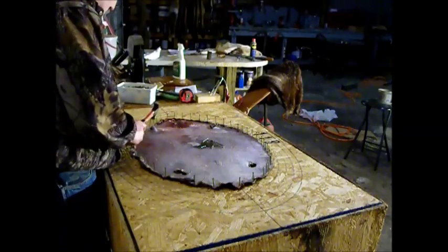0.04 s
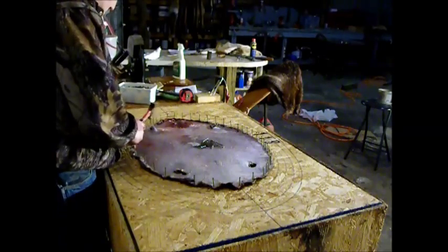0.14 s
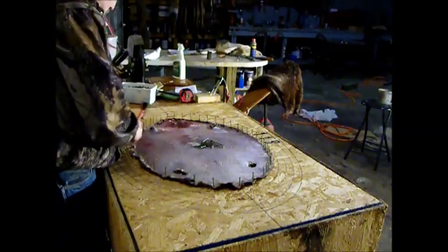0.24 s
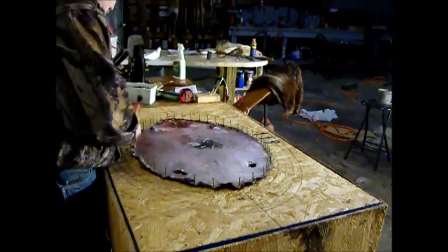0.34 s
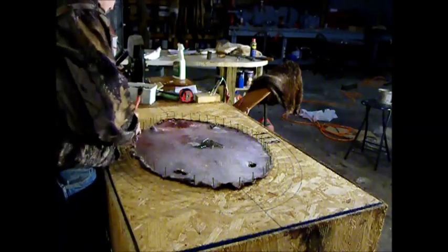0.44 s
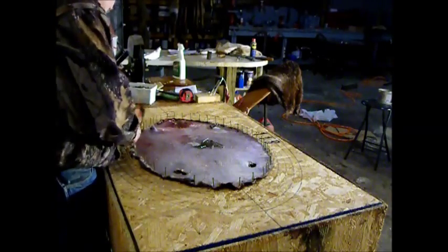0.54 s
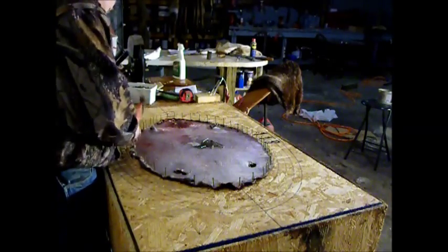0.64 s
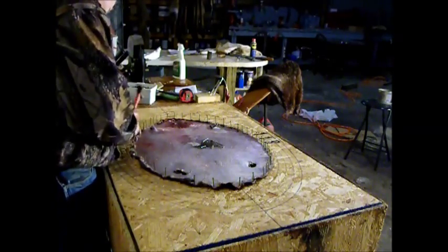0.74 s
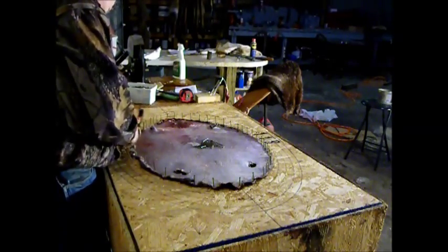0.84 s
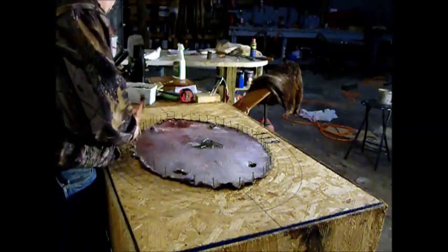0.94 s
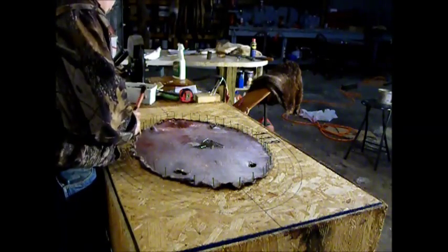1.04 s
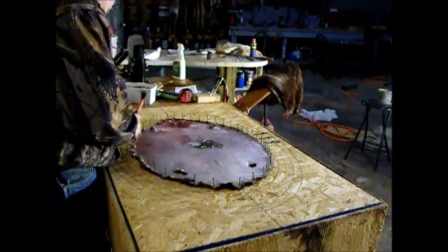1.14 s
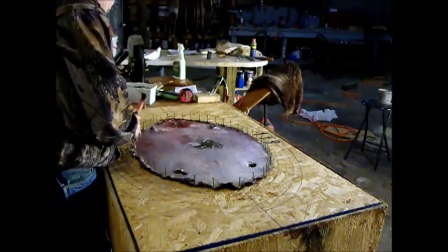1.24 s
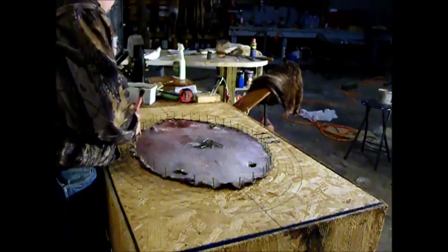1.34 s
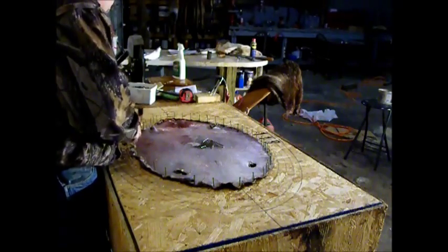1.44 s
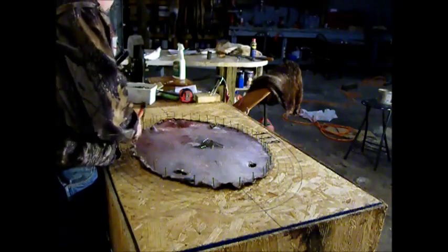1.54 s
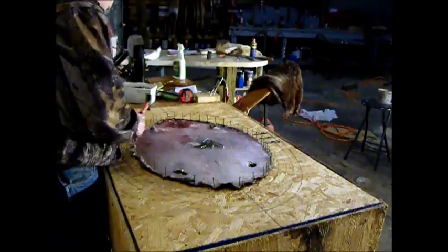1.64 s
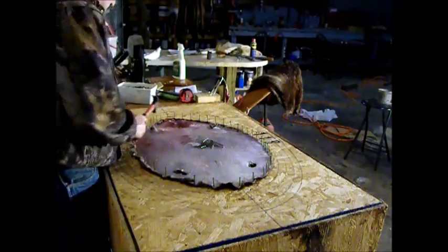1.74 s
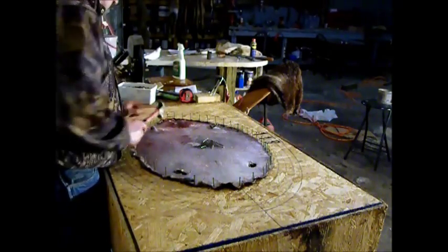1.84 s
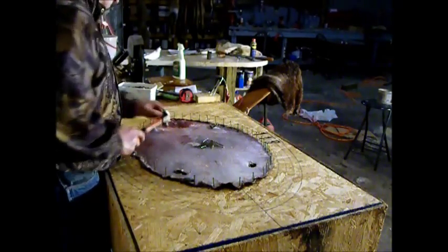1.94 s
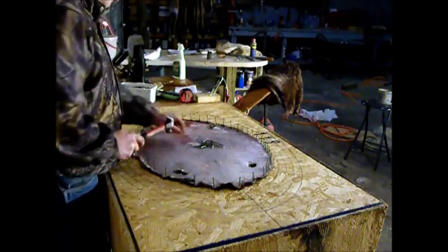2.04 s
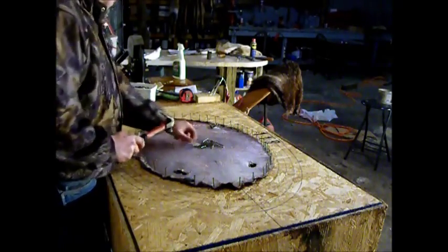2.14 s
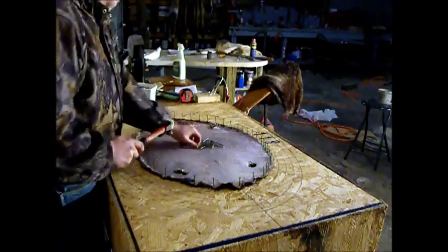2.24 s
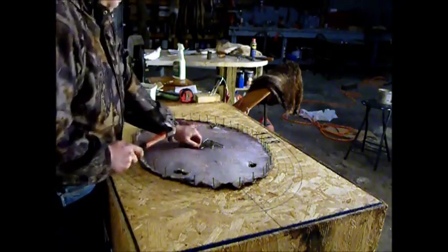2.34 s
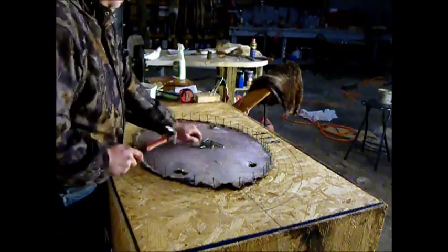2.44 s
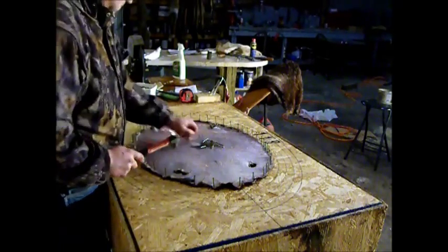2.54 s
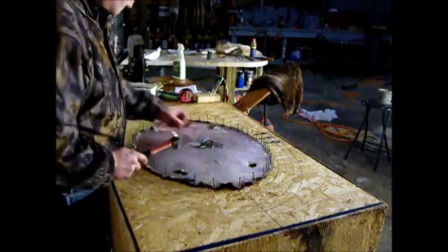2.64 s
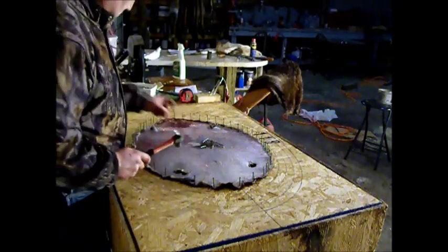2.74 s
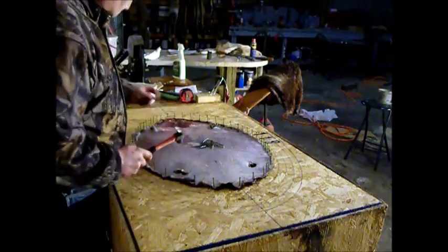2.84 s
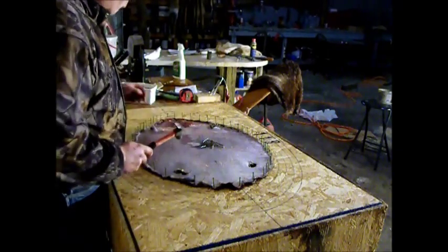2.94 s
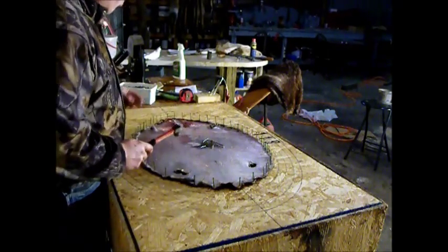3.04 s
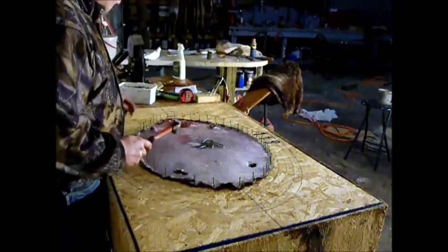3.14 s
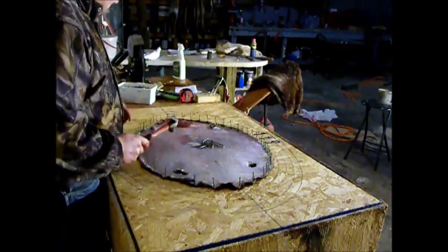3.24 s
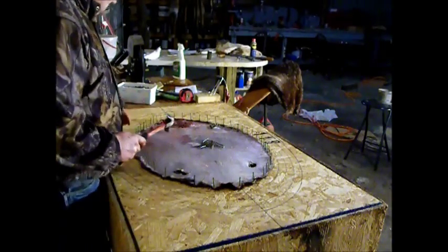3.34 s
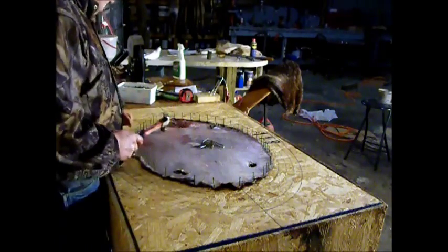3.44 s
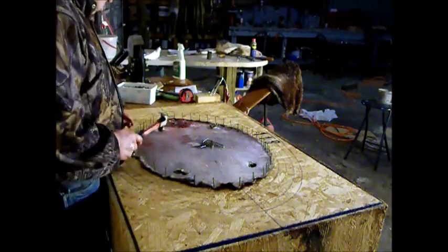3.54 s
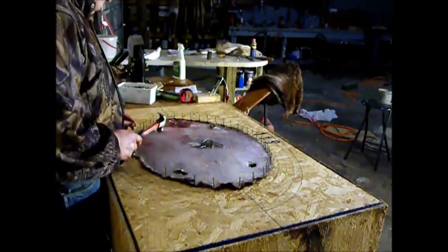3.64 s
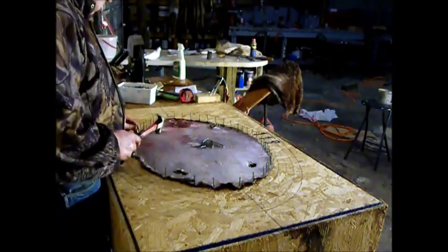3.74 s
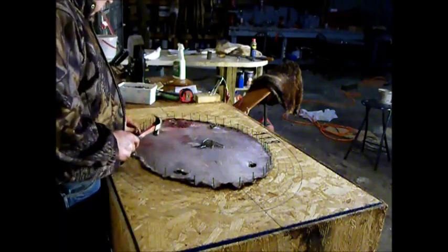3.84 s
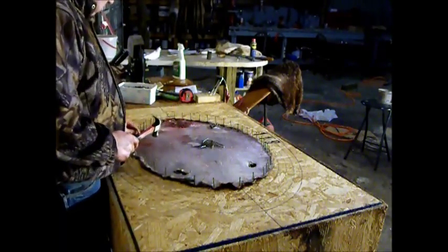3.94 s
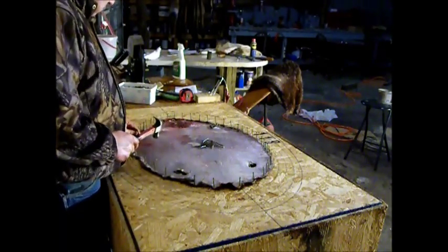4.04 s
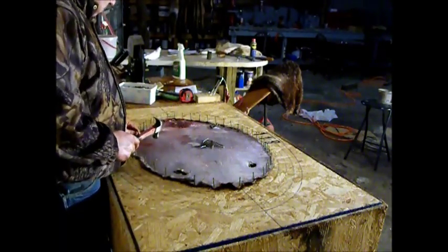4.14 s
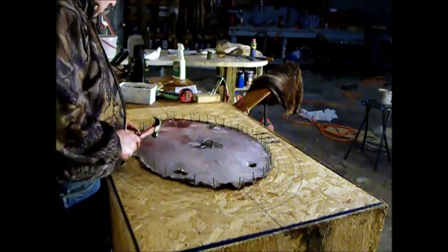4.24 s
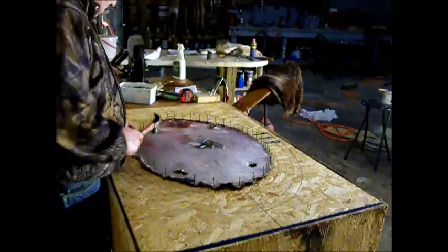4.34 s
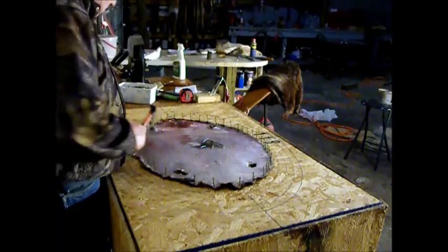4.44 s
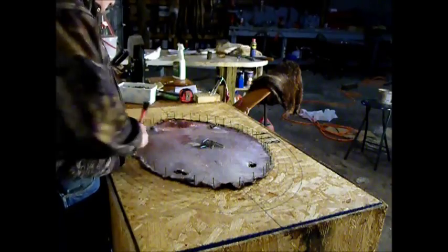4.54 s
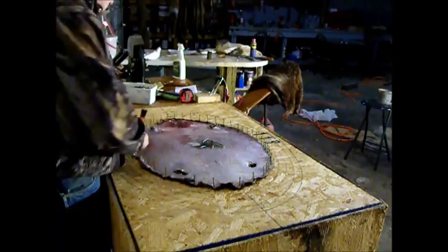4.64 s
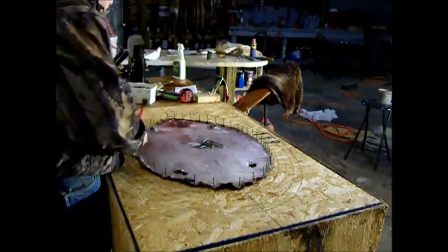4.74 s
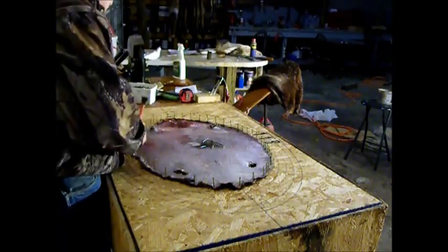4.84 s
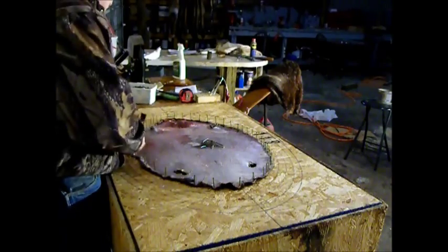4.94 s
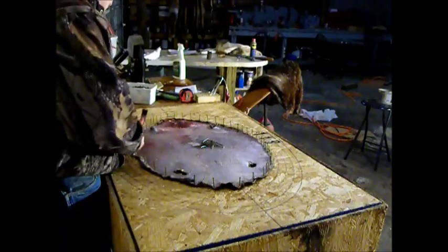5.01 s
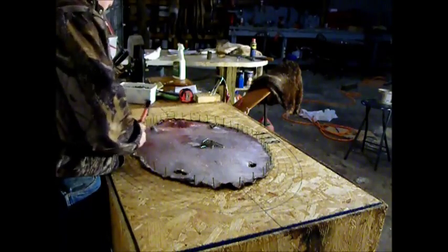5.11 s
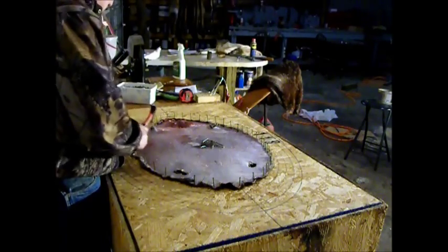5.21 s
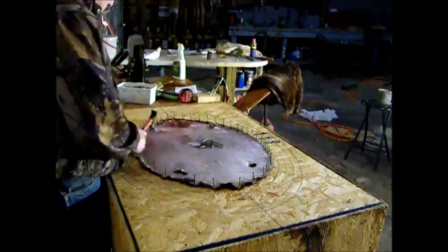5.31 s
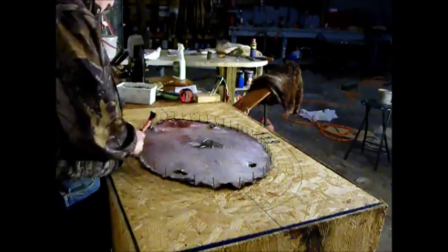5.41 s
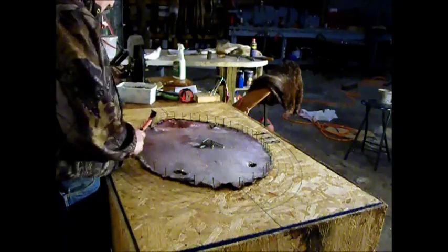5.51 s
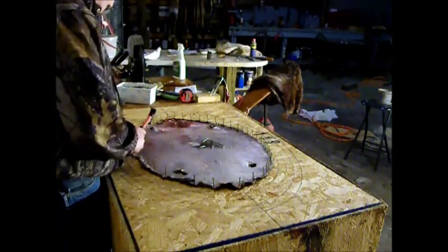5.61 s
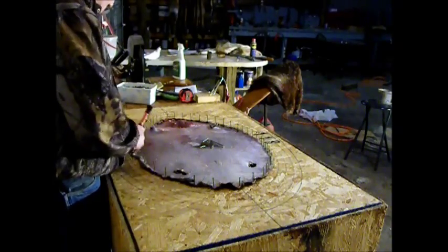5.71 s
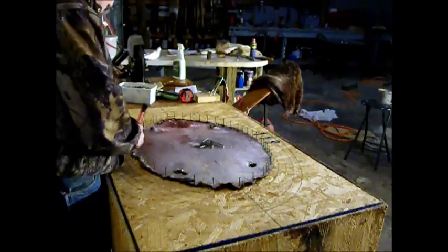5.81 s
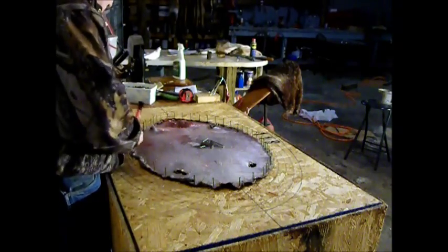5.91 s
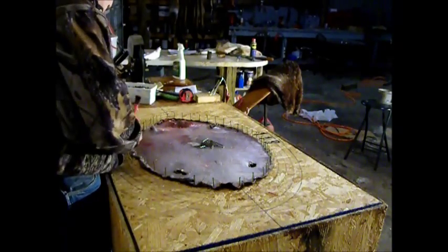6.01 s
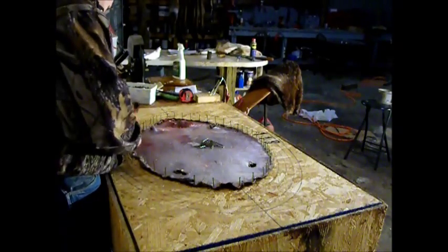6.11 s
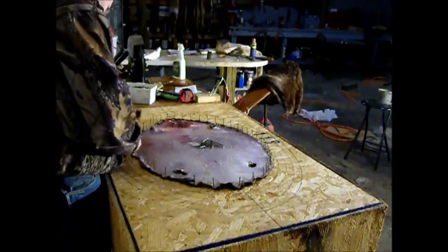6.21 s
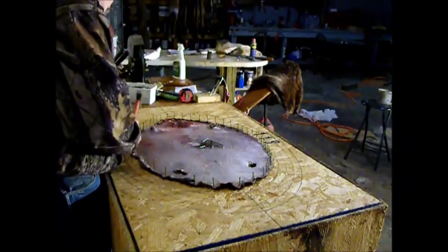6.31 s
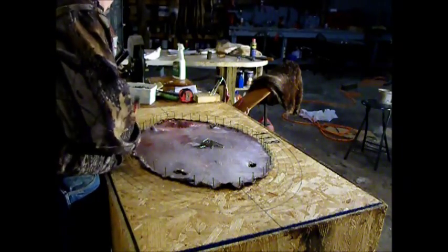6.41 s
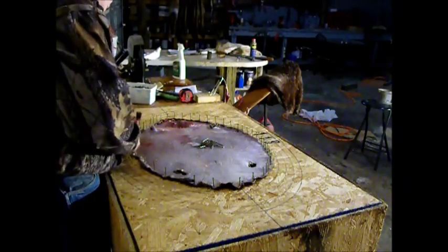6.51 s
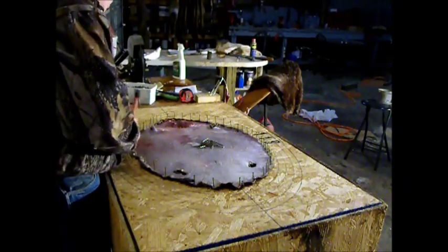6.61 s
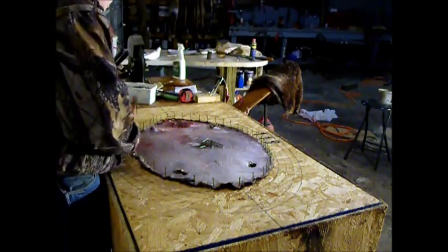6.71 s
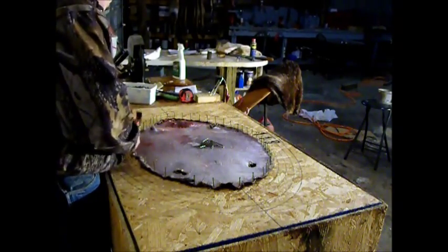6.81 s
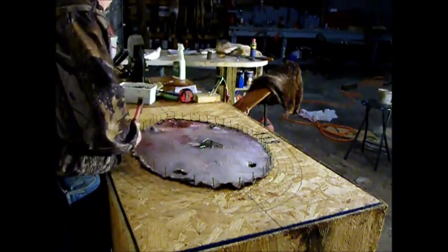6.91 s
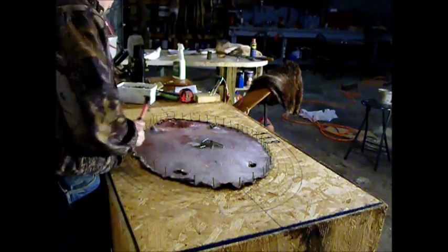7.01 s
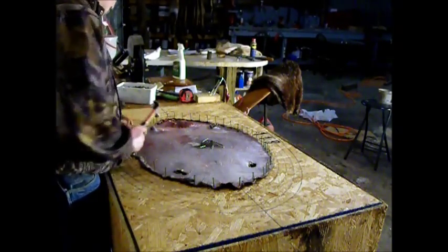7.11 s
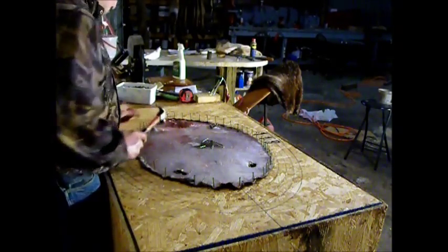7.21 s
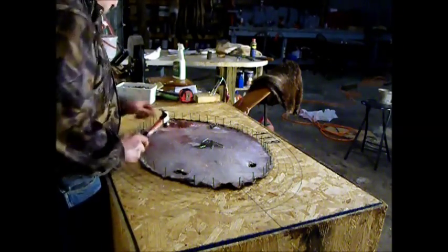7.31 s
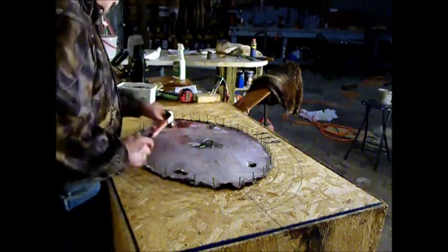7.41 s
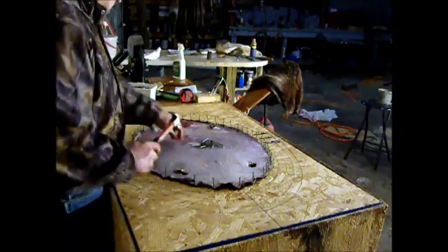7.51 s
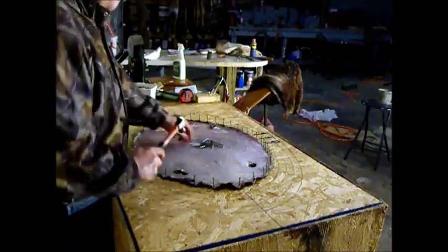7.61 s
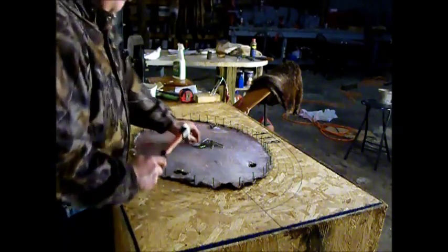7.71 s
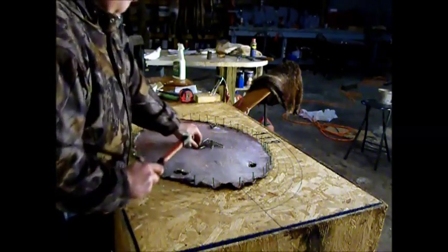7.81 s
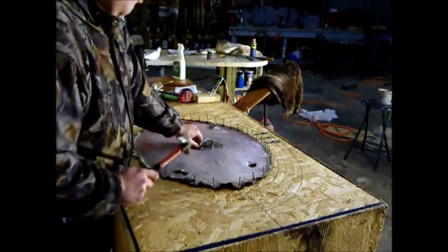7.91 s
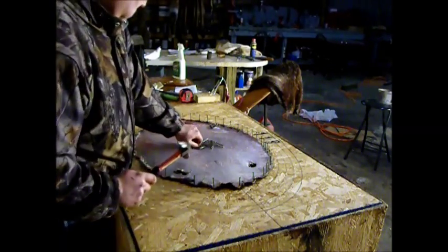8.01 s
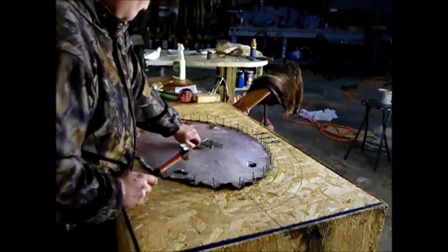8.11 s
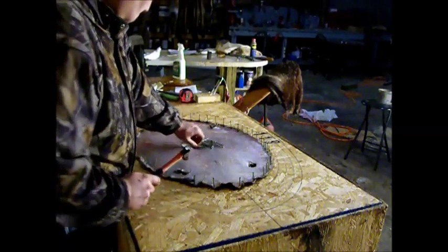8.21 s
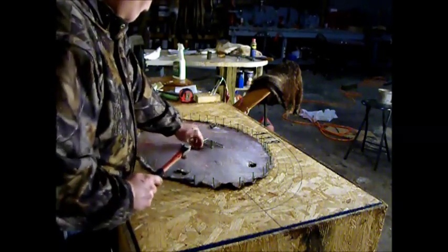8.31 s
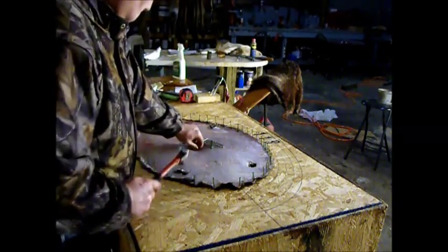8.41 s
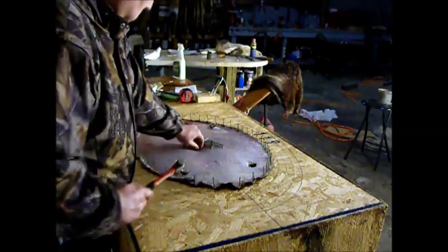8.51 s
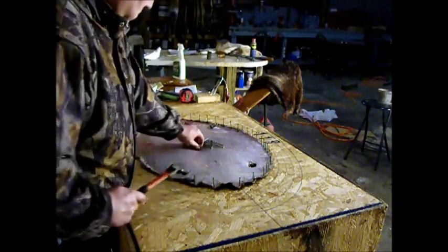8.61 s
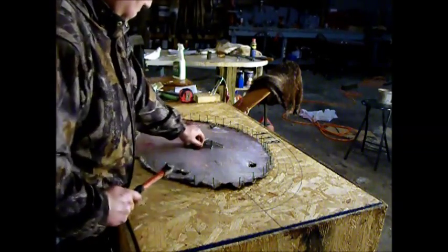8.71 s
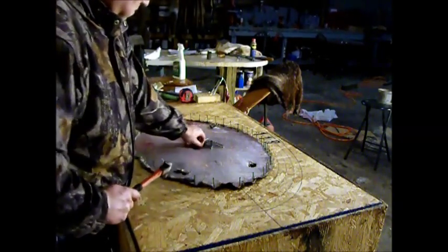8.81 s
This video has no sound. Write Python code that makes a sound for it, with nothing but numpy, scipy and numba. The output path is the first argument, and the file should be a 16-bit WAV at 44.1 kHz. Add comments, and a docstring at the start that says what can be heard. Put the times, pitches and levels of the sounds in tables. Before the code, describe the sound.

In a reverberant workshop, a hammer cracks on nails over a boxy wooden thump, three blows then four, separated by quiet metallic handling and cloth rustle.

```python
"""A workshop: a hammer drives nails through a stretched hide into a plywood box, seven sharp blows.
Each blow is a steel crack (shaped noise burst) over a box thump (noise burst and ringing modes).
Between them nails tick and clink (noise touches, decaying sines), and the hammer makes light knocks.
A jacket rustles and fingers rub the hide (grainy noise); the lights hum (harmonics) under steady air.
The recorder's limiter ducks at each blow and lets the room swell back up."""
import sys
import numpy as np
from scipy import signal
from scipy.fft import rfft, irfft, next_fast_len
from scipy.io import wavfile
from scipy.ndimage import uniform_filter1d
from numba import njit

SR = 44100
rng = np.random.default_rng(int(sys.argv[2]) if len(sys.argv) > 2 else 0)


def master_out(mix):
    """Clip the mix to full scale and print it as 16-bit PCM to the path in sys.argv[1]."""
    frames = np.transpose(np.atleast_2d(mix))
    ceiling = np.clip(frames, -1, 1)
    pcm = np.round(ceiling * 32767).astype(np.int16)
    wavfile.write(sys.argv[1], SR, pcm)


N = 390726
TIME = np.arange(N) / SR  # s

# What the steel pieces ring with, on the bench and in the hand; the standing nail is still high
# above the wood and sings on after its blow.
# Each row: frequency in Hz, relative level in dB, t60 in seconds.
LONG_NAIL = [(2783, -1.5, 0.079), (3056, -5, 0.15), (5211, -28, .15), (8250, -31, .06)]
LOOSE_TOOL = [(1630, -1.5, 0.49), (2309, -2, .2), (3250, -10, .2)]
NAIL_BUNCH = [(2084, -17, 0.4), (3410, -11, 0.17), (3835, -0.5, .18), (4091, -14, 0.11), (6290, -8, 0.076),
              (9000, 3, .025), (10030, 8, 0.055), (10400, 1, .04)]
HELD_NAIL = [(4460, -13.5, 0.19), (12200, -7, 0.089), (12520, -2, 0.12)]
STANDING_NAIL = [(3390, -6, .3), (5650, -11, .2), (9040, -12, .12)]


def undb(db):
    """Turn dB into an amplitude gain."""
    return 10 ** (np.asarray(db) / 20)


def unit(x):
    """Scale x to rms 1."""
    return x / np.sqrt(np.mean(x ** 2))


def at_hz(points, hz):
    """Read (Hz, value) points on a log-frequency axis."""
    point_hz, values = np.transpose(points)
    return np.interp(np.log(np.maximum(hz, 1)), np.log(point_hz), values)


def bump(hz, centre_hz, octaves):
    """A bell on the log-frequency axis, 1 at its centre."""
    return np.exp(-(np.log2(hz / centre_hz) / octaves) ** 2)


def fade(t, t60):
    """Exponential decay that loses 60 dB in t60 seconds."""
    return np.exp(-np.log(1000) * t / t60)


def colour(x, db_at):
    """Filter x by the gain curve db_at(Hz), then bring it to rms 1."""
    n = next_fast_len(len(x), real=True)
    hz = np.maximum(np.fft.rfftfreq(n, 1 / SR), 1)
    return unit(irfft(rfft(x, n) * undb(db_at(hz)), n)[:len(x)])


def noise(points, n):
    """Noise with the spectrum of (Hz, dB) points, at rms 1."""
    return colour(rng.standard_normal(n), lambda hz: at_hz(points, hz))


def walk(rate_hz):
    """Random wander in straight lines between normal draws, rate_hz of them a second."""
    return np.interp(TIME * rate_hz, np.arange(2000), rng.standard_normal(2000))


def ring(modes, t):
    """Resonance: decaying sines (Hz, dB, t60 in s) with chance phases."""
    return sum(undb(db) * fade(t, t60) * np.sin(2 * np.pi * (hz * t + rng.random()))
               for hz, db, t60 in modes)


def burst(db_at, t60):
    """A dying noise burst with the smooth spectrum db_at(Hz) and energy 1."""
    t = TIME[:SR // 3]
    gain = undb(db_at(np.maximum(np.fft.rfftfreq(len(t), 1 / SR), 1)))
    x = rng.standard_normal(len(t)) * fade(t, t60)
    for _ in range(4):  # even out the spectrum, keep the decay
        phase = np.angle(rfft(x))
        x = irfft(gain * np.exp(1j * phase), len(t)) * fade(t, 4 * t60)
    return x / np.sqrt(np.sum(x ** 2))


def add(track, s, x):
    """Mix x into the track at time s."""
    i = int(s * SR)
    track[i:i + len(x)] += x[:N - i]


def hammer(modes_db=-10, thump_db=24, crack_db=22, thump_t60=0.081, crack_t60=0.042,
           nail_octaves=0.15, push_s=0.00089):
    """Each blow cracks on the nail head, rings the held nail briefly and thumps the box."""
    # Hammer blows. Each row: start in seconds, relative board thump in dB, relative steel crack in dB,
    # crack treble in dB, first and second nail mode in Hz, lift of both modes in dB.
    blow_rows = [(0.6723, -4.5, -8, 9, 2130, 4100, 4), (0.9464, -1.5, -8, 4.5, 3400, 5440, 4.2),
                 (1.547, 3.5, 8, -6, 1530, 2950, 3.3), (5.0479, -2.5, -4, 4.5, 3340, 5420, 6.9),
                 (6.288, -5.5, -8, -4, 2220, 3750, 5.3), (6.5867, 3, 9.5, -0.5, 1980, 5340, 3.5),
                 (6.8719, 8.5, 16, -2, 2300, 4130, 3.9)]
    # Modes of the plywood box. Each row: frequency in Hz, relative level in dB, t60 in seconds.
    board_modes = [(112, -5, 0.12), (299, -11, 0.067), (345, -12, 0.05), (471, -4, 0.08), (587, -20, 0.03),
                   (760, 2, 0.053), (942, 3.5, 0.034), (1163, 3, 0.034), (1736, -30, 0.034),
                   (2000, -40, 0.047)]
    # Dense upper modes of the board. Each row: frequency in Hz, relative level in dB.
    thump_spectrum = [(50, -32), (85, -3.5), (160, 0.5), (230, -3), (320, 5.5), (480, 8), (700, 9),
                      (1200, 2.5), (2200, 1), (4000, -31), (9000, -21)]
    # The crack of steel on steel. Each row: frequency in Hz, relative level in dB.
    crack_spectrum = [(300, -48), (800, -4), (1300, -0.5), (2000, 1.5), (3200, 2.5), (5500, 2),
                      (7000, -0.5), (9500, -9.5), (11500, -20.5), (15500, -36)]
    out, t = np.zeros(N), TIME[:SR // 3]
    for s, thump, crack, treble_db, first_hz, second_hz, lift_db in blow_rows:
        box = undb(modes_db) * ring(board_modes, t)
        box += undb(thump_db) * burst(lambda hz: at_hz(thump_spectrum, hz), thump_t60)
        box *= 1 - np.exp(-t / push_s)  # the heavy board takes a moment to move
        # a squarer hit makes a shorter contact and more top
        top = [(1500, 0), (9000, treble_db)]

        def steel_db(hz):
            # gripped by the wood, the nail's modes are broad
            shank = bump(hz, first_hz, nail_octaves) + bump(hz, second_hz, nail_octaves)
            return at_hz(crack_spectrum, hz) + at_hz(top, hz) + lift_db * shank

        steel = burst(steel_db, crack_t60)
        add(out, s, undb(thump) * box + undb(crack + crack_db) * steel)
    return out


def clinks(clink_db=-3, neighbour_db=-7):
    """Steel pieces ring as free bars along with slightly detuned, shorter-lived neighbours."""
    # Steel pieces knocked. Each row: start in seconds, modes of the piece, relative level in dB.
    clink_rows = [(2.588, LONG_NAIL, -20), (2.974, LOOSE_TOOL, -41.5), (5.049, STANDING_NAIL, -19),
                  (7.5959, NAIL_BUNCH, -20.5), (7.846, NAIL_BUNCH, -39.5), (8.114, HELD_NAIL, -37),
                  (8.133, HELD_NAIL, -20), (8.194, HELD_NAIL, -32), (8.531, HELD_NAIL, -23.5),
                  (8.552, HELD_NAIL, -19.5), (8.780, HELD_NAIL, -40)]
    out, t = np.zeros(N), TIME[:SR // 2]
    for s, modes, strength_db in clink_rows:
        neighbours = []
        for hz, db, t60 in modes:
            for detune in rng.uniform(-.025, .025, size=4):
                neighbours.append((hz * (1 + detune), db + neighbour_db, t60 * .5))
        add(out, s, undb(clink_db + strength_db) * ring(modes + neighbours, t))
    return out


def contact(centre_hz, octaves, t60, soft_hz=11500):
    """A light touch with energy 1; the contact time rounds off the very top."""
    def touch_db(hz):
        band_db = np.maximum(-6 * (np.log2(hz / centre_hz) / octaves) ** 2, -55)
        return band_db - 10 * np.log10(1 + (hz / soft_hz) ** 6)
    return burst(touch_db, t60)


def handling(tick_db=-2, knock_db=-2, tick_t60=0.0175, fidget_hz=6800, fidget_octaves=3.5, scatter_db=5):
    """Ticks and light knocks, with fainter ticks scattered by chance while the hands are busy."""
    # Dry ticks of nails and fingertips.
    # Each row: start in seconds, relative energy in dB, centre in Hz, width in octaves.
    tick_rows = [(0.3406, 1.5, 6200, 0.53), (2.335, -12.5, 7000, 3.1), (2.426, -13.5, 8000, 2.5),
                 (2.506, -8, 9150, 0.38), (2.809, -14, 5760, 1), (2.85, -11.5, 4020, 1.3),
                 (3.2229, -1, 6650, 0.81), (3.548, -14, 6260, 0.48), (3.881, -14.5, 4500, 0.59),
                 (4.437, -16.5, 4880, .9), (7.595, 9.5, 9650, .4), (8.132, -2.5, 10800, 1),
                 (8.273, -4, 6500, 1.8), (8.475, -4, 7600, 1.1), (8.5928, 5, 8000, 2)]
    # Light knocks of the hammer and hand on the work.
    # Each row: start in seconds, relative energy in dB, centre in Hz, width in octaves, t60 in seconds.
    knock_rows = [(0.3134, 0, 2640, 1.55, 0.23), (2.5843, -3.5, 1370, 1.7, 0.036),
                  (2.971, -11, 1740, 1.33, 0.3), (3.911, -18.5, 1200, .8, .15),
                  (7.501, -7.5, 1390, 0.56, .02), (7.569, -4.5, 2500, 7.2, 0.12),
                  (7.5953, -0.5, 1580, 2.2, 0.027), (8.712, -14.5, 485, 0.43, .086)]
    # Spells of faint ticks. Each row: start and end in seconds, ticks per second, mean energy in dB.
    fidget_rows = [(2.349, 3.15, 6.4, -23), (8.151, 8.79, 14, -15.5)]
    out = np.zeros(N)
    for s, db, centre_hz, octaves in tick_rows:
        add(out, s, undb(db + tick_db) * contact(centre_hz, octaves, tick_t60))
    for s, db, centre_hz, octaves, t60 in knock_rows:
        add(out, s, undb(db + knock_db) * contact(centre_hz, octaves, t60))
    faint = contact(fidget_hz, fidget_octaves, tick_t60)
    for start, end, rate, db in fidget_rows:
        chances = rng.uniform(-1, 1, size=(32, 2))
        for slot, (late, size) in zip(np.arange(start, end, 1 / rate), chances):
            s = min(slot + late / (2 * rate), end)
            add(out, s, undb(db + scatter_db * size) * faint)
    return out


def swells(rows):
    """Gain of smooth movements (s, dB, length s): a bell each, about 9 dB down at its ends."""
    return np.sqrt(sum((undb(db) * np.exp(-(2 * (TIME - s) / length) ** 2)) ** 2
                       for s, db, length in rows))


def stroke(s, rise_s, fall_s):
    """Gain of one stroke: it grows by 20 dB over the rise and loses as much over the fall."""
    return undb(-20 * np.maximum((s - TIME) / rise_s, (TIME - s) / fall_s))


def friction(gain, spectrum, grain_db, flutter_db):
    """A dense run of tiny slips of uneven size, coming in gusts."""
    grains = undb(grain_db * rng.standard_normal(N // 32 + 1))
    size = np.repeat(grains, 32)[:N]  # each grain lasts 32 samples
    slips = colour(rng.standard_normal(N) * size, lambda hz: at_hz(spectrum, hz))
    return slips * gain * undb(flutter_db * walk(60))


def rubbing(cloth_rest_db=-60):
    """The sleeve swishes, nails slide together, and each stroke draws hand and nail point over the hide."""
    # Jacket sleeve, one swish for each arm movement.
    # Each row: fastest moment in seconds, level in dB, length in seconds.
    swishes = [(2.05, -51, 0.57), (2.52, -46, 0.2), (2.77, -54, 0.44), (3.38, -53, 0.82),
               (3.81, -50.5, 0.56), (4.69, -47.5, 0.33), (6.1, -58.5, 0.31), (7.25, -47.5, 0.75),
               (7.9, -42.5, 0.23), (8.5, -53, 0.93)]
    # Nails sliding on each other. Each row: fastest moment in seconds, level in dB, length in seconds.
    slides = [(2.07, -46, 0.23), (2.47, -51, 0.33)]
    # Strokes of the hand over the hide, a nail point trailing. Each row: fastest moment in seconds,
    # hand level in dB, nail point level in dB, rise in seconds, fall in seconds.
    strokes = [(7.47, -50, -24, 0.063, 0.046), (7.62, -36, -55, 0.12, 0.13),
               (8.255, -42, -37.5, 0.29, 0.12), (8.56, -37, -29.5, .16, 0.23),
               (8.75, -40.5, -43, 0.16, 0.064)]
    # Spectra of the jacket, the sliding nails, the hand on the hide and the dry hide under a nail point.
    # Each row: frequency in Hz, relative level in dB.
    cloth_spectrum = [(300, -8.5), (1000, 1), (2500, 0.5), (4500, 2), (6300, 8), (9500, 1.5), (12000, -8.5),
                      (15500, -7.5)]
    steel_spectrum = [(2800, -24), (3550, -14.5), (3900, -5.5), (4350, -30), (8500, -16.5), (10400, -13),
                      (11200, -30)]
    hide_spectrum = [(150, -18), (450, 7.5), (1200, 5.5), (3000, 4), (6500, 6), (10000, -7), (15500, -24)]
    point_spectrum = [(1500, -21), (3000, -13.5), (5000, -2), (6500, 5.5), (10000, 0), (12500, -8),
                      (15500, -14)]
    sleeve = np.hypot(swells(swishes), undb(cloth_rest_db))  # the jacket never lies quite still
    hand = sum(undb(db) * stroke(s, rise, fall) for s, db, _, rise, fall in strokes)
    point = sum(undb(db) * stroke(s, rise, fall) for s, _, db, rise, fall in strokes)
    return (friction(sleeve, cloth_spectrum, grain_db=2.5, flutter_db=2.3)
            + friction(swells(slides), steel_spectrum, grain_db=4.0, flutter_db=0.8)
            + friction(hand, hide_spectrum, grain_db=4.5, flutter_db=3.5)
            + friction(point, point_spectrum, grain_db=5.0, flutter_db=2))


def workshop(x, tail_db=-6, build_s=0.0051, echoes=((.0037, -8), (.0064, -6))):
    """Two near reflections (s, dB), then a diffuse tail that builds up."""
    # Colour of the room tail. Each row: frequency in Hz, relative level in dB.
    room_spectrum = [(60, 7), (120, 3.5), (300, 11), (600, 6.5), (1200, 4), (3000, 2.5), (6500, 0.5),
                     (10000, 2.5), (15000, 5.5)]
    # Decay of the room tail. Each row: frequency in Hz, t60 in seconds.
    room_t60 = [(80, 0.5), (250, 0.54), (450, 0.53), (1000, 0.29), (3000, 0.5), (6500, 0.52), (14000, 0.27)]
    build = 1 - np.exp(-TIME[:SR] / build_s)
    spectrum = rfft(dying(rng.standard_normal(SR), room_t60) * build)
    power = abs(spectrum) ** 2
    # the clutter scatters evenly, so no narrow band stands out
    spectrum *= np.sqrt(uniform_filter1d(power, size=500) / uniform_filter1d(power, size=40))
    tail = colour(irfft(spectrum, SR), lambda hz: at_hz(room_spectrum, hz))[:3 * SR // 4]
    response = undb(tail_db) * tail / np.sqrt(np.sum(tail ** 2))
    for s, db in echoes:
        response[int(s * SR)] += undb(db)
    return signal.fftconvolve(x, response)[:N]


def dying(x, t60_points):
    """Let each half octave of x die at its own rate."""
    t, spectrum = TIME[:len(x)], rfft(x)
    half_octave = 2 * np.log2(np.maximum(np.fft.rfftfreq(len(x), 1 / SR), 2 ** 5))
    out = np.zeros(len(x))
    for k in range(10, 30):
        band = irfft(spectrum * np.maximum(1 - abs(half_octave - k), 0), len(x))
        out += band * fade(t, at_hz(t60_points, 2 ** (k / 2)))
    return out


def background(air_db=-56, hum_db=0, waver_db=1.0):
    """Steady hiss and slightly wavering mains harmonics."""
    # Workshop air. Each row: frequency in Hz, relative level in dB.
    air_spectrum = [(25, -12.5), (45, 7), (65, 6), (150, -3.5), (260, -2.5), (450, 6.5), (800, 6.5),
                    (1500, -0.5), (4200, -5), (6600, -17.5), (9000, -21), (11000, -12), (15500, -16)]
    # Mains hum of the lights. Each row: frequency in Hz, level in dB rms.
    hum_rows = [(60, -89), (120, -69), (360, -70), (480, -65.5), (600, -69.5), (720, -70), (840, -68),
                (2340, -77), (2460, -69), (2940, -85), (3660, -74.5), (5220, -72.5), (5340, -79)]
    hum = sum(undb(db + waver_db * walk(4.2)) * np.sin(2 * np.pi * (hz * TIME + rng.random()))
              for hz, db in hum_rows)
    # the root of 2 turns rms into peak level
    return undb(air_db) * noise(air_spectrum, N) + undb(hum_db) * np.sqrt(2) * hum


def scene(small_db=-0.5, small_room_db=-1):
    """Blows and small handling sounds in the workshop, over its hum."""
    blows = hammer()
    small = handling() + clinks() + rubbing()
    direct = blows + undb(small_db) * small
    room = workshop(blows + undb(small_room_db) * small)
    return (direct + room + background())[None]


@njit
def follow(x, attack, release):
    """Peak follower: charges quickly, leaks slowly."""
    out, level = np.empty(len(x)), 0.
    for i in range(len(x)):
        level += max(abs(x[i]) - level, 0.) * attack - level * release
        out[i] = level
    return out


def record(dry, limit_db=-5, attack_s=0.00021, release_s=0.061, lag_s=0.00071, ceiling=0.78,
           low_cut_hz=65, top_hz=15900):
    """Recorder: a limiter whose overshoot clips, a low cut, two notches against motor noise, a cut top."""
    x = dry[0]
    envelope = follow(x, 1 / (attack_s * SR), 1 / (release_s * SR))
    duck = 1 - 1 / np.maximum(envelope / undb(limit_db), 1)
    # the gain comes down a moment late, so the first milliseconds of a blow overload
    pole = np.exp(-1 / (lag_s * SR))
    late_duck = signal.lfilter([1 - pole], [1, -pole], duck)
    x = np.clip(x * (1 - late_duck), -ceiling, ceiling)
    x = signal.sosfilt(signal.butter(2, low_cut_hz, "high", fs=SR, output="sos"), x)
    for notch_hz, width_hz in ((190, 68), (7880, 780)):
        x = signal.lfilter(*signal.iirnotch(notch_hz, notch_hz / width_hz, fs=SR), x)
    return signal.sosfilt(signal.ellip(10, .2, 70, top_hz, fs=SR, output="sos"), x)[None]


dry = scene()
out = record(dry)
master_out(out)
```